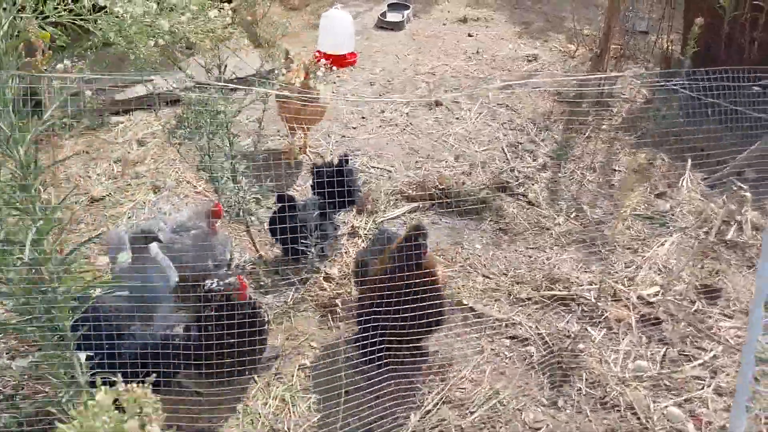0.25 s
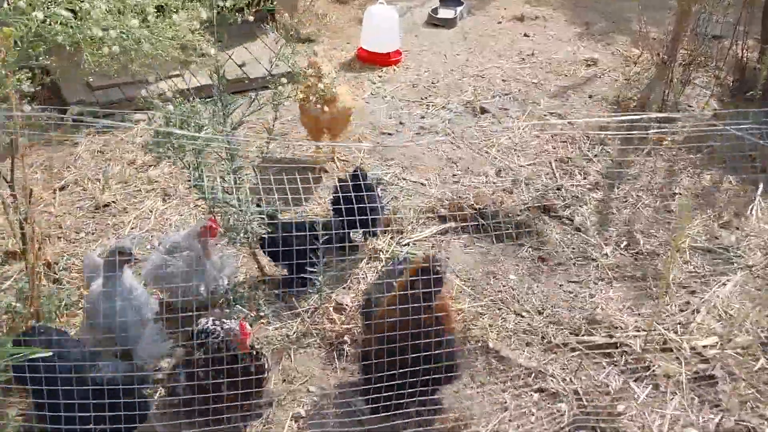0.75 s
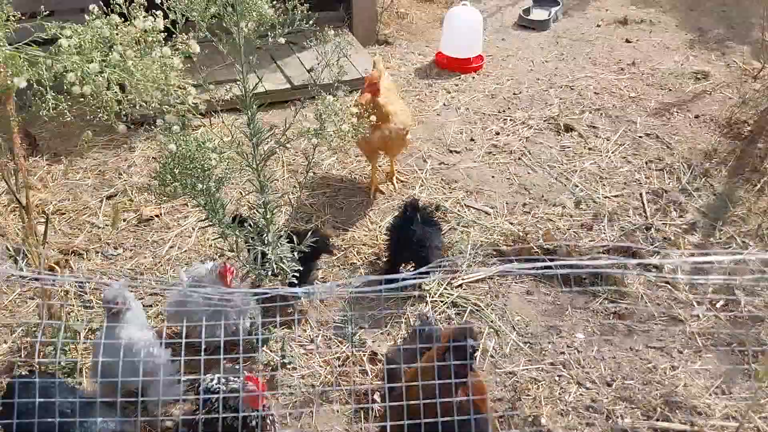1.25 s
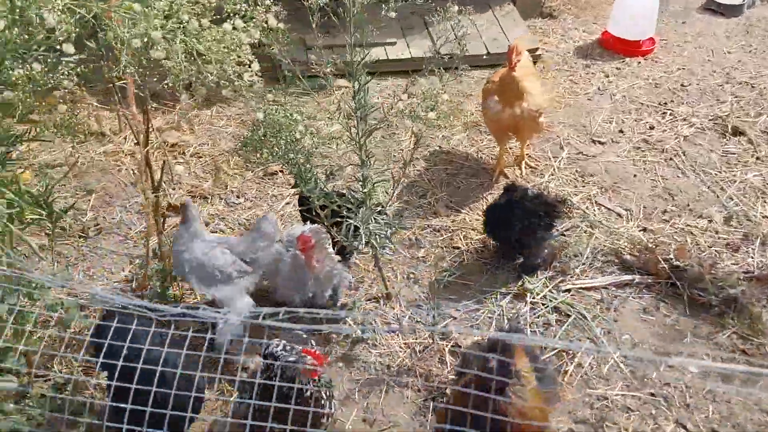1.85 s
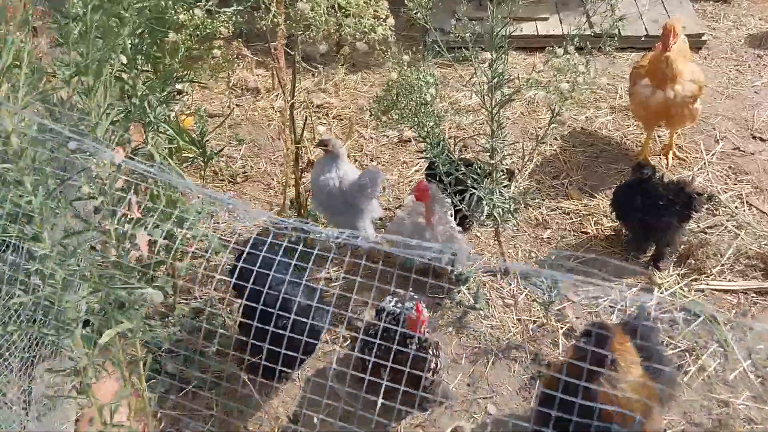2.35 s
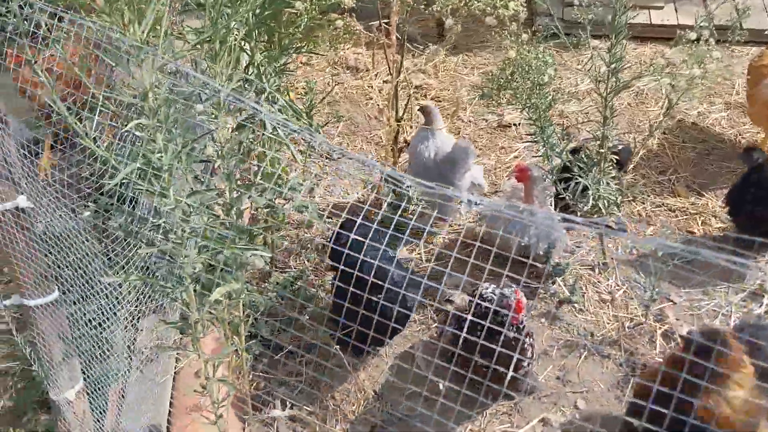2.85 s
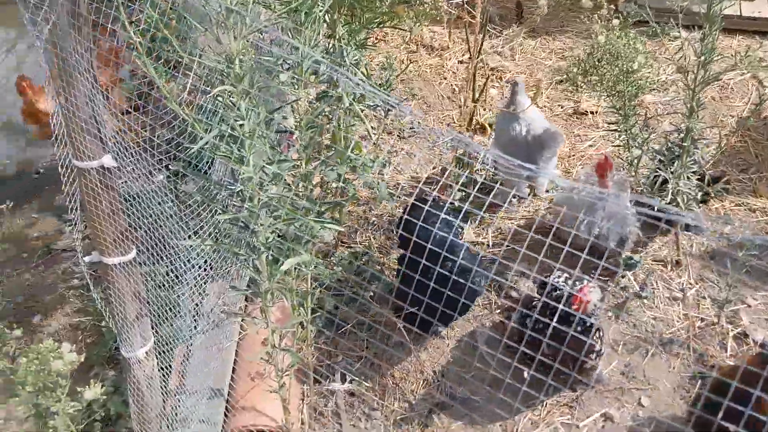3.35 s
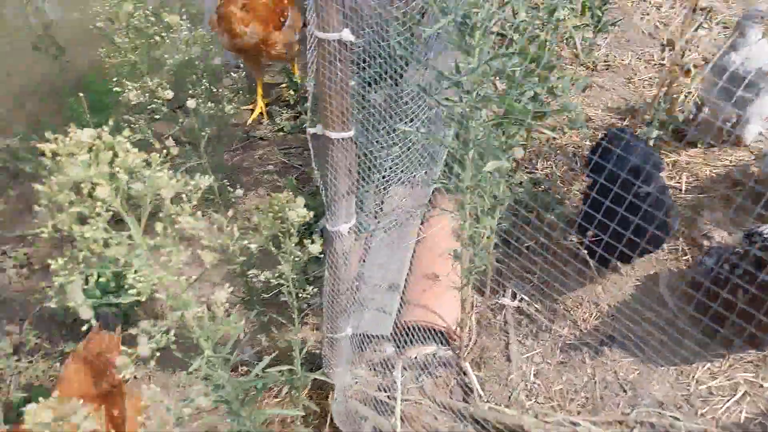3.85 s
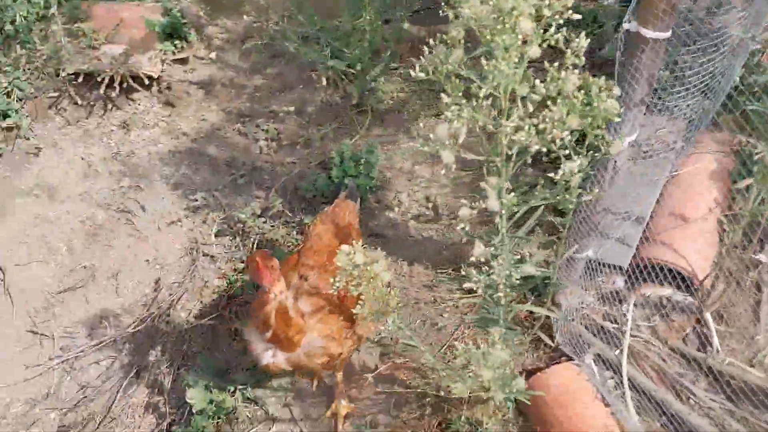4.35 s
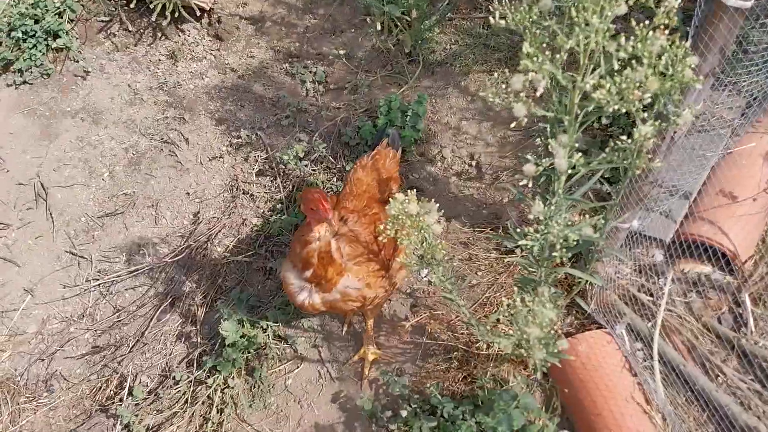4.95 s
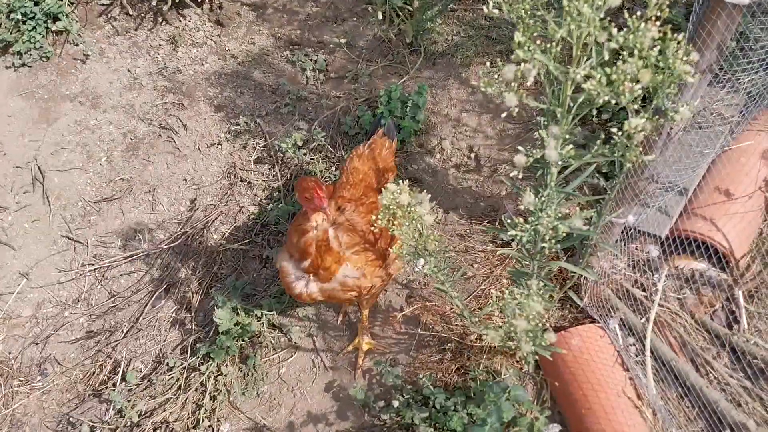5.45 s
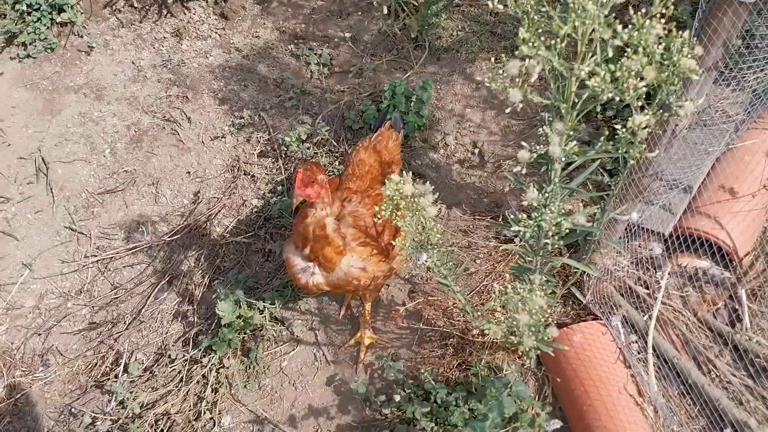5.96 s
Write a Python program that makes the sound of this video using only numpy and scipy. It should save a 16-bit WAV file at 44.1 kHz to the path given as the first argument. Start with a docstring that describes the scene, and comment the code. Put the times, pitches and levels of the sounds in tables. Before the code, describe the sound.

Chicks peep in short falling whistles while hens cluck and one whines softly, straw rustling underfoot as breeze thumps low on the left of the microphone.

```python
"""Chickens in a straw-covered run, heard from the fence: chicks peep in falling whistles, hens cluck
and coo, and one holds a long whine; voices are harmonic pulses shaped by throat resonances.
Straw rustles as sparse noise cracks, feet scuff in bands of noise, and ticks are filtered bursts with a ring.
A breeze rumbles and thumps on the left port as gusty low noise and damped sines, over steady hiss."""
import sys
import numpy as np
from scipy import signal
from scipy.fft import rfft, irfft
from scipy.io import wavfile
from scipy.ndimage import uniform_filter1d

SR = 44100
rng = np.random.default_rng(int(sys.argv[2]) if len(sys.argv) > 2 else 0)


def bounce(signal):
    """Save signal as a 16-bit WAV file at the path given by the first command-line argument."""
    frames = np.transpose(np.atleast_2d(signal))
    limited = np.clip(frames, -1, 1)
    pcm = np.round(limited * 32767).astype(np.int16)
    wavfile.write(sys.argv[1], SR, pcm)


N = 274302
TIME_S = np.arange(N) / SR
TOP_HZ = 13500  # limit of the harmonics and of the recorder

# breeze between gusts, before BREEZE_GAIN_DB: t/s, level/dB
BREEZE = [(0.0, -60), (0.19, -67.5), (0.73, -48), (0.92, -62.5), (2.3, -62.5), (2.55, -68), (3.01, -66.5),
          (3.65, -44.5), (4.05, -52.5), (4.5, -46.5), (4.76, -58.5), (4.95, -64.5), (6.22, -60)]
# gusts on the left port: t/s, length/s, level/dB
GUSTS = [(.225, 0.087, -41), (.32, 0.059, -42), (.52, 0.1, -36.5), (.66, 0.3, -39), (1.09, 0.13, -41),
         (1.57, 0.083, -42.5), (1.73, 0.11, -46), (1.88, .1, -40.5), (2.2, 0.072, -53), (2.73, 0.083, -52),
         (3.47, 0.14, -35.5), (3.68, 0.16, -37.5), (3.86, 0.12, -32.5), (3.97, 0.096, -34.5),
         (4.17, 0.19, -47), (4.6, 0.093, -36), (5.01, .12, -52), (5.95, 0.077, -48)]
# rumble spectrum of the wind: f/Hz, relative level/dB
WIND_SPECTRUM = [(20, -19.5), (35, -11.5), (58, 8), (80, 1), (105, 2), (150, -5.5), (210, -11), (300, -22),
                 (450, -41.5), (800, -60), (2000, -62.5)]
# eddies thumping the left port, before their band-pass: t/s, f/Hz, level/dB, 60 dB decay/s
THUMPS = [(.7, 197.5, -15.5, 0.056), (0.71, 156, -18, 0.066), (3.461, 210.6, -21.5, 0.11),
          (3.4711, 240, -13.5, 0.026), (3.875, 211.6, -34, 0.29), (3.914, 103, -6.5, 0.013),
          (3.992, 107, -12, 0.032)]
# low buffets reaching both ports, before BUFFET_LEFT_DB: t/s, length/s, level/dB
BUFFETS = [(.39, 0.13, -63.5), (5.87, 0.061, -58)]
# hiss spectrum: f/Hz, relative level/dB
HISS_SPECTRUM = [(120, -25.5), (200, -0.5), (358, -10), (629, -16.5), (1110, -21), (1910, -25), (2810, -27),
                 (3660, -29), (5030, -18.5), (6000, -31.5), (7550, -25.5), (8690, -32), (11300, -18),
                 (12800, -18.5), (13500, -37.5)]
# light stirring of straw under the flock: t/s, level/dB
STIRRING = [(0, -77), (.7, -70), (1.3, -74), (1.6, -67.5), (2.4, -69.5), (3.15, -81.5), (4.4, -77),
            (5.15, -88), (5.4, -76.5), (6.2, -76.5)]
# steps or scratches rustling the straw: t/s, length/s, level/dB
RUSTLES = [(.365, 0.084, -63.5), (.555, 0.094, -61), (.65, .2, -68.5), (.96, 0.11, -68.5),
           (1.07, .08, -59.5), (1.39, 0.18, -59), (1.67, 0.06, -65.5), (1.845, 0.16, -58.5),
           (2.225, 0.15, -59), (2.56, 0.053, -66), (2.86, 0.15, -76), (4.44, 0.11, -70), (5.29, .08, -71)]
# straw spectrum: f/Hz, relative level/dB
STRAW_SPECTRUM = [(300, 11), (800, 6.5), (1700, 3.5), (3000, 7.5), (5000, 7.5), (8000, 7), (11000, 9.5),
                  (13000, 6.5)]
# feet scuffing soil and straw: t/s, length/s, level/dB, centre f/Hz
SCUFFS = [(0.393, 0.13, -70, 790), (0.524, 0.18, -63.5, 1280), (0.573, 0.036, -56, 1230),
          (0.759, 0.47, -71, 1740), (1.103, 0.14, -70.5, 1520), (1.363, 0.074, -68, 1210),
          (1.404, 0.13, -57.5, 1380), (1.883, .13, -63.5, 1510), (2.153, 0.058, -72, 810),
          (2.217, 0.18, -60, 1100), (3.454, 0.094, -71, 960), (5.403, 0.1, -71.5, 8900),
          (6.027, 0.094, -71, 7700)]
# beak and stalk ticks: t/s, level before TICK_GAIN_DB/dB, ring f/Hz, ring re crack/dB,
# share of bright snap [0-1], 60 dB decay/s
TICKS = [(0.0962, -27.5, 1460, -4, 1, 0.02), (0.111, -32, 1580, -17.5, 1, 0.096),
         (.497, -52, 2500, -25, 1, 0.01), (.786, -47, 2980, -12, 0.84, .005),
         (1.083, -46.5, 2470, -3, 0.95, 0.071), (4.023, -59.5, 2330, -3, 0.4, 0.0072),
         (1.252, -50, 1780, -3, 1, 0.012), (2.231, -39, 3770, -3.5, 1, 0.01),
         (2.263, -41.5, 3160, -1, 1, 0.01), (2.398, -59, 2410, 7, 0, 0.0086),
         (4.271, -50, 5300, -1, 0.97, 0.0062), (5.282, -23, 1480, -22.5, 1, 0.0093),
         (5.303, -46, 2870, -8, 0.94, 0.004), (5.359, -49.5, 2280, 5.5, 1, 0.009),
         (5.651, -41, 1210, 6.5, 0, 0.049), (5.8304, -37.5, 1176, 0.5, 0.15, 0.014),
         (6, -44, 1400, 3.5, 0.1, 0.015), (6.003, -37, 1570, -0.5, 0.03, 0.015),
         (6.192, -47, 1310, 5, 0.16, 0.037), (6.196, -33, 2310, -4.5, 0.03, 0.0066)]
# snap of a dry stalk: f/Hz, relative level/dB
SNAP = [(300, -8), (1400, -21), (3000, -13), (4500, -12.5), (6500, 1.5), (8500, -7), (10500, 8.5),
        (13000, 5.5)]
# duller clack of a beak: f/Hz, relative level/dB
CLACK = [(300, -9), (700, 1), (1300, 8.5), (1900, -4), (2600, 12), (3300, -7.5), (3900, 2), (5200, -22),
         (7000, -99), (12000, -30)]
# chick peeps: t/s, length/s, first f/Hz, last f/Hz, steepest point [share of length],
# loudest point [share of length], level/dB, overtone gain/dB, roughness [-]
PEEPS = [(0.211, .16, 3050, 2055, .52, 0.83, -61.5, 3, 0.12),
         (.653, .13, 3090, 2355, 0.22, 0.6, -59.5, -9, 0.3),
         (.664, .12, 2600, 2000, 0.37, 0.7, -55, -14, 0.26),
         (.977, 0.15, 3110, 1890, 0.43, 0.66, -58, -6, 0.22),
         (1.432, .11, 2960, 2166, .33, 0.3, -62.5, -1, 0.34),
         (1.486, .11, 2950, 2370, 0.44, 0.65, -65.5, -9, 0.5),
         (1.709, 0.13, 2930, 2054, 0.46, 0.52, -56.5, -11, 0.08),
         (1.741, 0.15, 2797, 1990, 0.64, 0.47, -54.5, -3.5, 0.64),
         (2.25, 0.077, 3000, 2180, 0.49, 0.75, -61, 2, 0.17),
         (2.517, .063, 3120, 2770, 0.53, 0.5, -64.5, -9, 0.2),
         (2.555, 0.075, 2654, 2320, .6, 0.5, -61, -5.5, .1),
         (2.736, .25, 3164, 2270, .26, 0.45, -62, 2.5, .15),
         (2.941, .135, 2807, 2040, 0.65, 0.22, -61, -1, 0.7),
         (3.852, .12, 3150, 2350, 0.39, 0.37, -54.5, -12, 0.16),
         (4.13, 0.13, 3290, 2505, 0.57, 0.44, -56, -13, .17),
         (4.209, .11, 2573, 2200, .52, 0.32, -56, -4, 0.24),
         (4.213, .12, 2986, 1820, .52, 0.6, -62, -15, 1.1),
         (4.449, .18, 3080, 2175, 0.62, 0.56, -64, -0.5, 0.37),
         (4.51, .1, 3350, 2900, 0.98, 0.5, -67, 0, 1),
         (4.568, 0.099, 2764, 2010, 0.87, 0.59, -55, -15, .29),
         (4.842, 0.17, 3134, 2050, 0.77, 0.57, -66, -6, 0.32),
         (5.286, 0.069, 3126, 2870, 0.8, 0.56, -66.5, -13, .6),
         (5.331, .071, 2700, 2340, .38, 0.43, -59.5, -8, 0.24),
         (5.723, .11, 2550, 1980, .75, 0.39, -57, -13, 0.16)]
# chick's throat: f/Hz, relative level/dB
CHICK_THROAT = [(1500, -25), (2000, 3), (2450, -1), (3100, -5.5), (3800, -14), (4400, -9), (4900, -9),
                (5500, -18), (6100, -17), (7400, -17), (8300, -31), (9300, -25), (12000, -44)]
# hens' bearing as the microphone turns: t/s, delay of the left port/ms
BEARING = [(0, 0.064), (3.5, 0.17), (5.2, 0.17), (5.42, 0.43), (6.2, 0.43)]
# hen clucks: t/s, length/s, first f/Hz, last f/Hz, level/dB, beak opening [0-1], roughness [-],
# loudest point [share of length]
CLUCKS = [(1.082, 0.034, 415, 382, -59, 0.3, 0.45, 0.65), (1.245, 0.087, 206.4, 196, -55, 0.22, 1.04, 0),
          (1.269, 0.031, 195.5, 218, -44.5, 0.22, 0.37, 0.74),
          (1.822, 0.038, 193, 238.4, -39, 0.01, 0.31, 1), (3.395, .04, 606, 757, -47, 0.33, 0.83, 0),
          (5.159, 0.075, 544, 457, -60.5, 0.43, 0.96, 0.75),
          (5.192, 0.037, 362, 452, -48.5, 0.43, 0.24, 0.3), (5.24, 0.014, 436, 430, -53, 0.26, 0.23, 0.55),
          (5.372, 0.053, 488, 423, -49.5, 0.47, 0.55, 0.95),
          (5.404, 0.073, 623, 650, -41, 0.93, 0.19, 0.37), (5.592, 0.059, 641.5, 618, -43, 1, 0.19, 0.44),
          (5.645, 0.013, 641, 628, -46.5, 1, 0.4, 0.46), (6.09, 0.029, 190, 230.3, -41.5, 0.05, 0.37, 1),
          (6.139, 0.0077, 218, 220, -62, 0.3, 0.7, 0.5)]
# hen's throat, beak shut: f/Hz, relative level/dB
SHUT_THROAT = [(100, -28.5), (215, 8.5), (430, -3.5), (650, 10.5), (870, -3), (1080, 1), (1350, -24),
               (1650, -22.5), (2150, -23.5), (2900, -36), (6000, -83)]
# hen's throat, beak open: f/Hz, relative level/dB
OPEN_THROAT = [(150, -24), (400, -2.5), (640, -4.5), (900, 1.5), (1280, 4), (1550, 0), (1900, -26),
               (2520, -23), (3150, -36), (3850, -27), (4450, -28.5), (5600, -42.5), (10000, -71)]
# soft falling coos of a second hen: t/s, length/s, first f/Hz, last f/Hz, level/dB
COOS = [(2.729, 0.046, 864, 714, -53), (3.181, 0.032, 490, 328, -49), (3.299, 0.043, 511, 367, -49.5),
        (3.472, 0.044, 513, 452, -52)]
# shut-beak tone of whine and coos: f/Hz, relative level/dB
WHINE_TONE = [(560, -1.5), (1130, -32.5), (1700, -36.5), (2300, -50), (4000, -45)]
# rasp of the whine when faint: f/Hz, relative level/dB
WHINE_RASP = [(250, -19), (480, -10.5), (700, 2), (900, -7.5), (1100, -9), (1400, -32.5), (1700, -33),
              (2000, -43), (4000, -59)]
# rasp added when the voice is forced: f/Hz, relative level/dB
FORCED_RASP = [(500, -15), (800, -3), (1100, 6), (1400, -2.5), (1650, -2), (1950, -33), (4000, -43.5)]
# strains of the whining hen: t/s, length/s, rasp level/dB
STRAINS = [(2.745, 0.089, -50), (2.84, .05, -56), (3.05, 0.12, -51.5), (3.14, 0.1, -53.5),
           (3.29, 0.14, -51), (3.375, 0.033, -47.5)]

BREEZE_GAIN_DB, BUFFET_LEFT_DB = 8, 6
GUST_PEAK, GUST_SHARPNESS = 0.4, 0.68  # top as share of length; power of the swell
SHELTER_DB, SHELTERED_FLOOR_DB = -41, -79  # right port: its share of the wind, its own rumble
HISS_LEFT_DB, HISS_RIGHT_DB, STEADY_TONE_DB = -73, -74, -88
RUSTLE_PEAK, RUSTLE_SHARPNESS = 0.19, 1.33  # top as share of length; power of the swell
TICK_GAIN_DB = -21.5
PEEP_STEEPNESS = 2.1  # how tightly the fall is packed around its steepest point
PEEP_FLICKER_DB, OVERTONE_FLICKER_DB = 3, 3.5  # whole note; extra on overtones
WHINE_START_S, WHINE_END_S, WHINE_FADE_S = 2.76, 3.41, 0.0072
WHINE_HZ, WHINE_DB = 567.4, -48.5
WHINE_ENTRY_HZ, WHINE_LIFT_HZ, WHINE_BEND_S = 30.47, 90, 0.011  # rises above WHINE_HZ at start and end
WHINE_WAVER, WHINE_SHIVER = 0.01193, .013  # slow and fast drift, shares of the pitch
RELAXED_RASP_DB = -65.5


def amp(db):
    """Amplitude ratio of a level in dB."""
    return 10 ** (np.asarray(db) / 20)


def unit(x):
    """Scale to unit RMS."""
    return x / np.sqrt(np.mean(x ** 2) + 1e-20)


def curves(table):
    """Each column of a table of timed rows, at every sample."""
    t_s, *columns = np.transpose(table)
    return [np.interp(TIME_S, t_s, column) for column in columns]


def add(track, t_s, x):
    """Mix a sound in at t_s."""
    i = max(int(t_s * SR), 0)
    track[i:i + len(x)] += x[:max(N - i, 0)]


def wander(n, rate_hz):
    """Smooth chance with spread near 1: random points joined by lines."""
    return np.interp(np.arange(n) * rate_hz / SR, np.arange(N // 2), rng.standard_normal(N // 2))


def colour(x, points, size=2048):
    """Minimum-phase filter with the given f/Hz, level/dB response."""
    hz, db = np.transpose(points)
    bin_hz = np.arange(size // 2 + 1) * SR / size
    log_gain = np.log(amp(np.interp(np.log(bin_hz + 1), np.log(hz), db)))
    cepstrum = irfft(log_gain)
    # folding the cepstrum makes the response causal
    cepstrum[1:size // 2] *= 2
    cepstrum[size // 2 + 1:] = 0
    impulse = irfft(np.exp(rfft(cepstrum)))
    return signal.fftconvolve(x, impulse)[:len(x)]


def band(x, hz, q):
    """One resonance."""
    b, a = signal.iirpeak(min(hz, SR / 2 - 2000), max(q, hz / 15000), fs=SR)
    return signal.lfilter(b, a, x)


def swell(n, peak):
    """Sine-shaped rise and fall, topping at the given share of its length."""
    knots = [0, np.clip(peak, .05, .95), 1]
    return np.sin(np.interp(np.linspace(0, 1, n), knots, [0, np.pi / 2, np.pi]))


def swells(table, peak, sharpness):
    """Envelope of t/s, length/s, level/dB events of one shape; overlaps add in power."""
    power = np.zeros(N)
    for t_s, length_s, db in table:
        shape = np.abs(swell(int(length_s * SR), peak)) ** sharpness
        add(power, t_s, (amp(db) * shape) ** 2)
    return np.sqrt(power)


def pulses(hz, count):
    """Pulses of the syrinx: equal harmonics of a moving pitch."""
    phase = 2 * np.pi * np.cumsum(hz) / SR
    return sum(np.cos(k * phase) for k in range(1, count + 1) if k * hz.mean() < TOP_HZ)


def place(x, left_db, lag_ms, scatter_db, t60_s):
    """Direct sound reaches the left port later and weaker; ground and fence scatter it briefly."""
    t = np.arange(SR // 3) / SR
    scatter = []
    for _ in range(2):
        tail = unit(rng.standard_normal(len(t)) * amp(-60 * t / t60_s)) / np.sqrt(len(t))
        scatter.append(signal.fftconvolve(x, tail)[:N])
    delayed = np.interp(TIME_S - lag_ms / 1000, TIME_S, x)
    ports = np.array([delayed, x]) + amp(scatter_db) * np.array(scatter)
    return ports * np.array([[amp(left_db)], [1]])


def turbulence():
    """Low rumble of air across a port, evened out so that the flow sets its level."""
    x = colour(rng.standard_normal(N), WIND_SPECTRUM, size=8192)
    return x / np.sqrt(uniform_filter1d(x ** 2, size=3000) + 1e-12)


def thumps():
    """Single eddies: damped sines, band-passed."""
    eddies, t = np.zeros(N), np.arange(SR // 8) / SR
    for t_s, hz, db, t60_s in THUMPS:
        add(eddies, t_s, -np.sin(2 * np.pi * hz * t) * amp(db - 60 * t / t60_s))
    return signal.sosfilt(signal.butter(2, [70, 900], "band", fs=SR, output="sos"), eddies)


def wind():
    """Breeze and gusts stir the left port, the right is sheltered; stronger flow reaches higher."""
    breeze = amp(curves(BREEZE)[0] + BREEZE_GAIN_DB + 1.33 * wander(N, 16))
    gusts = swells(GUSTS, GUST_PEAK, GUST_SHARPNESS)
    flow = np.hypot(breeze, gusts) * amp(1.9 * wander(N, 30))
    flutter = unit(band(band(rng.standard_normal(N), 260, 1.5), 260, 1.2))
    flutter = flutter * amp(5 * wander(N, 40))
    strength = np.minimum(flow / amp(-32.5), 1)
    left = (turbulence() + amp(-23) * strength * flutter) * flow + thumps()
    right = turbulence() * np.hypot(amp(SHELTER_DB) * flow, amp(SHELTERED_FLOOR_DB))
    rumble = unit(band(band(rng.standard_normal(N), 174, 1.0), 174, 1.0))
    buffets = rumble * swells(BUFFETS, peak=0.12, sharpness=1.16)
    return np.array([left + amp(BUFFET_LEFT_DB) * buffets, right + buffets])


def hiss():
    """Faint steady noise, unrelated at the two ports, and a thin steady electronic tone."""
    noise = np.array([unit(colour(rng.standard_normal(N), HISS_SPECTRUM)) * amp(db)
                      for db in (HISS_LEFT_DB, HISS_RIGHT_DB)])
    return noise + amp(STEADY_TONE_DB) * np.sin(2 * np.pi * SR / 4 * TIME_S)


def straw():
    """Dense tiny cracks of dry stalks, and gritty scuffs of feet in bands of noise."""
    out = np.zeros((2, N))
    stir = np.hypot(amp(curves(STIRRING)[0]), swells(RUSTLES, RUSTLE_PEAK, RUSTLE_SHARPNESS))
    for port, straw_db, grit_db in zip(out, (-13, 0), (-12.5, -.5)):
        struck = rng.random(N) < .06  # share of samples that crack
        size_db = 2.8 * np.minimum(rng.exponential(size=N), 5)
        cracks = rng.standard_normal(N) * struck * amp(size_db)
        port += unit(colour(cracks, STRAW_SPECTRUM)) * stir * amp(straw_db + 2.3 * wander(N, 120))
        for t_s, length_s, scuff_db, hz in SCUFFS:
            n = int(length_s * SR)
            grit = rng.standard_normal(n) * amp(4.5 * wander(n, 300))
            scuff = band(band(grit, hz, 1.0), hz, 0.36) * swell(n, 0.29)
            add(port, t_s, amp(scuff_db + grit_db) * unit(scuff))
    return out


def ticks():
    """A brief crack, between dull clack and bright snap, and the damped ring of what was struck."""
    out, t = np.zeros(N), np.arange(SR // 12) / SR
    for t_s, db, ring_hz, ring_db, bright, t60_s in TICKS:
        crack, strike = rng.standard_normal((2, len(t))) * amp(-60 * t / t60_s)
        bright = np.clip(bright, 0, 1)
        tick = bright * unit(colour(crack, SNAP)) + (1 - bright) * unit(colour(crack, CLACK))
        ring = unit(band(strike, ring_hz, 10.6))
        add(out, t_s, amp(db + TICK_GAIN_DB) * (tick + amp(ring_db) * ring))
    return place(out, left_db=-11, lag_ms=.25, scatter_db=-20, t60_s=.12)


def chicks():
    """Peeps hang, drop and level off through the throat resonances; rough ones shiver fast in pitch."""
    out = np.zeros(N)
    for t_s, length_s, first_hz, last_hz, steepest, loudest, db, overtone_db, rough in PEEPS:
        n = int(length_s * SR)
        fall = np.tanh(PEEP_STEEPNESS * (np.linspace(0, 1, n) - steepest))
        hz = np.interp(fall, fall[[0, -1]], [first_hz, last_hz])
        hz = hz * (1 + .009 * wander(n, 110) + .052 * rough * wander(n, 900))
        whistle = pulses(hz, count=1)
        overtones = pulses(hz, count=4) - whistle
        overtones = overtones * amp(overtone_db + OVERTONE_FLICKER_DB * wander(n, 35.3))
        source = whistle * swell(n, loudest) ** 1.08 + overtones * swell(n, 0.38) ** 0.71
        note = colour(source * amp(PEEP_FLICKER_DB * wander(n, 84.7)), CHICK_THROAT)
        add(out, t_s, amp(db) * unit(note))
    return place(out, left_db=-6.5, lag_ms=.07, scatter_db=-7.5, t60_s=.14)


def clucks():
    """Short bursts of pulses; an open beak lifts the upper resonances, a rough note jitters and rasps."""
    out = np.zeros(N)
    for t_s, length_s, first_hz, last_hz, db, opening, rough, peak in CLUCKS:
        n = int(length_s * SR)
        hz = np.linspace(first_hz, last_hz, n) * (1 + 0.12 * rough * wander(n, 403))
        voice = unit(pulses(hz, count=28)) + 0.41 * rough * rng.standard_normal(n)
        source = np.pad(voice * swell(n, peak) ** 1.3, (0, SR // 50))  # room for the throat to ring out
        opening = np.clip(opening, 0, 1)
        note = (1 - opening) * colour(source, SHUT_THROAT) + opening * colour(source, OPEN_THROAT)
        add(out, t_s, amp(db) * note / np.sqrt(np.mean(note[:n] ** 2)))
    return out


def coos():
    """Short, nearly pure notes that sink in pitch."""
    out = np.zeros(N)
    for t_s, length_s, first_hz, last_hz, db in COOS:
        n = int(length_s * SR)
        source = pulses(np.linspace(first_hz, last_hz, n), count=3) * swell(n, 0.6)
        add(out, t_s, amp(db) * unit(colour(source, WHINE_TONE)))
    return out


def whine():
    """Held, almost pure shut-beak note; its rasp, pulsing with each cycle, brightens under strain."""
    since_s = np.maximum(TIME_S - WHINE_START_S, 0)
    until_s = np.maximum(WHINE_END_S - TIME_S, 0)
    entry_hz = WHINE_ENTRY_HZ * np.exp(-since_s / WHINE_BEND_S)
    lift_hz = WHINE_LIFT_HZ * np.exp(-until_s / WHINE_BEND_S)
    hz = (WHINE_HZ + entry_hz + lift_hz) * (1 + WHINE_WAVER * wander(N, 25))
    hz = hz * (1 + WHINE_SHIVER * wander(N, 250))
    gate = np.clip(np.minimum(since_s, until_s) / WHINE_FADE_S, 0, 1)
    tone = unit(colour(pulses(hz, count=6), WHINE_TONE)) * amp(WHINE_DB + 1.06 * wander(N, 90))
    air = rng.standard_normal(N) * (1 + 0.7 * np.cos(2 * np.pi * np.cumsum(hz) / SR))
    air = air * amp(4 * wander(N, 45))
    strain = np.hypot(amp(RELAXED_RASP_DB), swells(STRAINS, peak=0.64, sharpness=0.68))
    force = np.sqrt(strain / strain.max())
    rasp = unit(colour(air, WHINE_RASP)) + amp(-10) * force * unit(colour(air, FORCED_RASP))
    return gate * (tone + rasp * strain)


def scene():
    """Sum of all sources at the left and right ports."""
    lag_ms, = curves(BEARING)
    hens = place(clucks() + coos() + whine(), left_db=-3.5, lag_ms=lag_ms, scatter_db=-16, t60_s=.13)
    return wind() + hiss() + straw() + ticks() + chicks() + hens


def record(dry):
    """The recorder cuts the top steeply."""
    return signal.sosfilt(signal.ellip(10, .2, 60, TOP_HZ, fs=SR, output="sos"), dry)


dry = scene()
out = record(dry)
bounce(out)
```